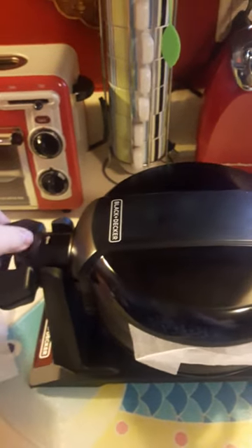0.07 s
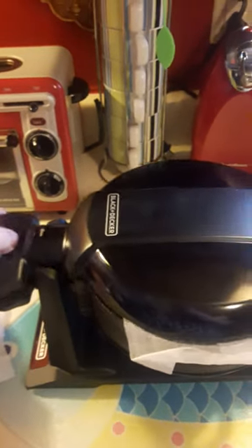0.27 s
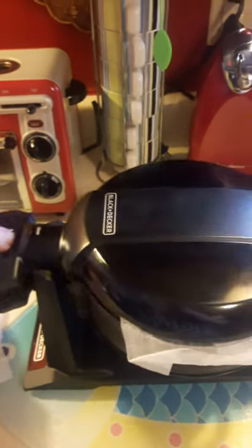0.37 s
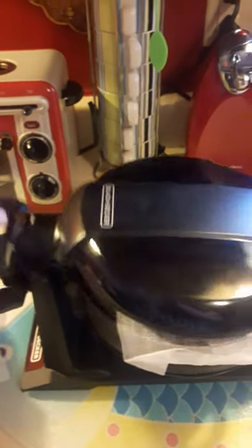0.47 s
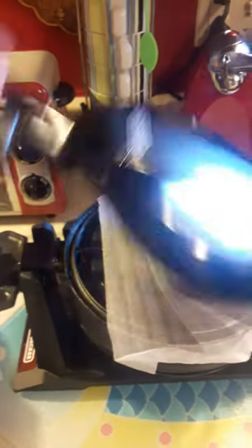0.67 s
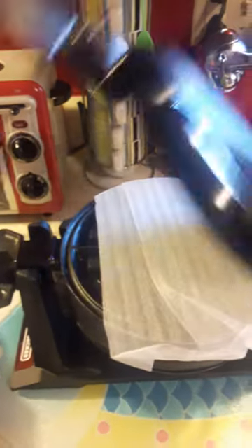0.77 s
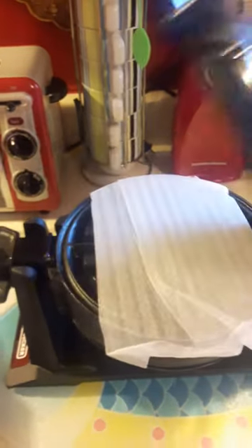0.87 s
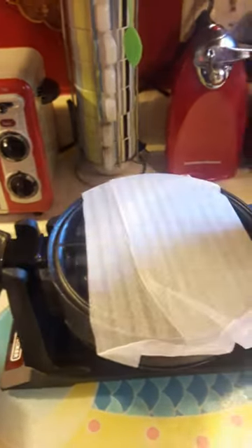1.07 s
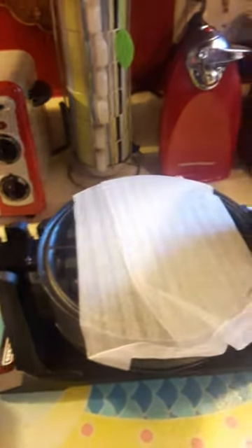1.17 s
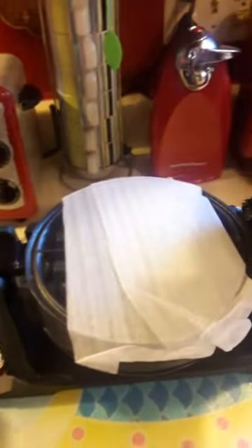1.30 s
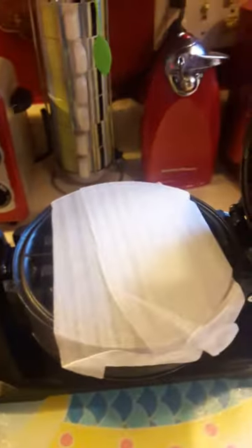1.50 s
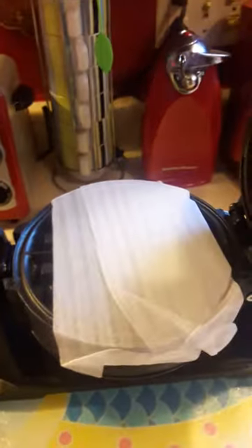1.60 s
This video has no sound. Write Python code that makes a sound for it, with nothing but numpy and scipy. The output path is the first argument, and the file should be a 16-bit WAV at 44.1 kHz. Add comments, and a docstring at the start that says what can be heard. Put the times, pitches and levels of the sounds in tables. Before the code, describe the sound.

A waffle maker's latch clacks sharply, then the lid swings open with hollow plastic knocks.

```python
"""A waffle maker's latch ticks, then snaps free with a sharp clack, close up in a quiet kitchen.
Each snap is a crack of plastic (a noise burst) plus the ring of the shell (damped modes).
The lid swings up, knocking and ticking in its hinge, and bumps against its stop.
The handle squeaks just before the latch, and faint friction follows the moving parts.
Every hit has a short room tail; a faint appliance hum and room air lie under it all."""
import sys
import numpy as np
from scipy import signal
from scipy.fft import rfft, irfft
from scipy.io import wavfile

SR = 44100
rng = np.random.default_rng(int(sys.argv[2]) if len(sys.argv) > 2 else 0)


def generate_wav(sig):
    """Save sig (samples, or channels by samples) to the path in sys.argv[1] as 16-bit PCM at SR."""
    pcm = np.round(np.clip(np.atleast_2d(sig).T, -1, 1) * 32767).astype(np.int16)
    wavfile.write(sys.argv[1], SR, pcm)


N = 72765
HIT_SAMPLES = SR // 2

# latch hits: (time [s], bass [dB], middle [dB], treble [dB], room send [dB], ring length [factor])
LATCH_SNAPS = [(.0912, -26.5, -38, -20, -8.5, 0.11), (.0945, -19, -17, -33.5, -10.5, .35),
               (.0995, -11.5, -23, -31.5, -9.5, .25), (.2238, -3, 2, 1.5, 0, 0.79)]
# ring of latch and closed shell: (frequency [Hz], level [dB], t60 [s], left-right [dB], attack [s])
SHELL_MODES = [(182.2, -34, 0.39, 2, 0.0094), (402, -23.5, 0.11, 0.5, 0.00045),
               (510.7, -21, 0.24, 4, 0.009), (560.4, -22, .24, -3, 0.0053), (692, -26, 0.18, -3, 0.0023),
               (780, -10.5, 0.046, -10, 0.00067), (811, -30, 0.46, -1.5, .01),
               (1042.3, -23, 0.32, -8.5, .01), (1065, -15.5, 0.059, 12, .002),
               (1367, -10.5, 0.039, 1.5, 0.00033), (1636, -24, 0.17, -1.5, .003),
               (2018, -32.5, 0.18, 0, .001), (2350, -28, 0.1, 3, 0.00087), (3796, -31.5, 0.1, 2.5, .001),
               (7530, -31.5, .15, -5.5, .001)]
# tone of the latch's crack and of its room tail: (frequency [Hz], level [dB])
LATCH_CRACK_COLOUR = [(40, -21.5), (200, -8), (500, -5.5), (850, 6), (1400, 1), (2500, -8), (4200, -2.5),
                      (7600, -4), (9700, -9.5), (11700, -11), (13300, -35), (14600, -28), (15800, -47.5)]
LATCH_TAIL_COLOUR = [(40, -17), (120, -14.5), (250, -6.5), (550, 0.5), (1050, 3.5), (1900, -10.5),
                     (3000, -14.5), (4000, -11.5), (7800, -14.5), (9600, -27), (11700, -19), (13300, -41.5),
                     (14600, -37), (15600, -61)]
def latch(crack_db=-9.0, shell_lag_s=0.002192, room_db=-21.5):
    """The catch cracks over its lip and the shell rings from the blow; the hand damps the first ticks."""
    out = np.zeros((2, N))
    for s, bass, middle, treble, send, length in LATCH_SNAPS:
        eq = [(300, bass), (900, middle), (4000, treble)]
        snap = crack(LATCH_CRACK_COLOUR, eq, lean=.1, attack_s=0.0029, t60=0.024, low_hz=260)
        add(out, s, amp(crack_db) * snap)
        add(out, s + shell_lag_s, ring(SHELL_MODES, eq, attack_s=0, length=length))
        add(out, s, amp(room_db + send) * room_tail(LATCH_TAIL_COLOUR, eq, build_s=.009))
    return out


# lid hits: (time [s], body [dB], thud [dB], upper middle [dB], treble [dB], room send [dB],
# pitch [factor], attack [s])
LID_KNOCKS = [(.749, -23, -19, -33, -40, 3.5, .95, 0.0052),
              (.9007, -10, -9.5, -19, -35.5, 1.5, 1.0, 0.0021),
              (1.2533, -17.5, -14, -14, -36, -13, 1.06, 0.0026),
              (1.2766, -3, -8.5, -8, -27.5, -15, .88, 0.0033), (1.3667, 3.5, 4, 1.5, 1.5, -2, 1.0, 0.00073),
              (1.3765, 0.5, -2.5, -0.5, -21, -3.5, 1.0, 0.00084),
              (1.407, -7.5, -22, -31, -28, -22, 0.85, 0.0024),
              (1.5981, -13, -6.5, -19.5, -37, -7, 1.02, .0005)]
# ring of the open lid: (frequency [Hz], level [dB], t60 [s], left-right [dB], attack [s])
LID_MODES = [(149, -43, 0.2, 3, 0.063), (188, -40.5, .17, 6, 0.0047), (381.3, -31, 0.086, 0.5, 0.00095),
             (514.2, -26.5, 0.084, 1.5, 0.0084), (668, -23.5, 0.082, -8, 0.0028),
             (735.8, -21, 0.073, -2.5, 0.003), (880, -36, 0.042, 40, 0.0012), (1134, -33, 0.12, -4, 0.0035),
             (1317, -34.5, 0.045, 7, 0.00087)]
# tone of the lid's clatter and of its room tail: (frequency [Hz], level [dB])
LID_CRACK_COLOUR = [(40, -32), (200, -28), (700, 5), (1300, -1.5), (2000, -2), (4000, -9.5), (7300, -10.5),
                    (9500, -20), (11000, -49), (15000, -50)]
LID_TAIL_COLOUR = [(40, -41), (170, 1), (330, -6), (700, 1), (1400, -13.5), (2400, -13.5), (4000, -27.5),
                   (7500, -28.5), (10000, -38.5), (15000, -56)]
def lid(crack_db=-26, room_db=-36):
    """The lid knocks in its hinge and bounces on its stop, ringing briefly each time."""
    out = np.zeros((2, N))
    for s, body, thud, upper, treble, send, pitch, attack_s in LID_KNOCKS:
        eq = [(180, body), (370, thud), (700, body), (2000, upper), (5500, treble)]
        clatter = crack(LID_CRACK_COLOUR, eq, lean=2.0, attack_s=0.0028, t60=0.05, low_hz=173)
        add(out, s, amp(crack_db) * clatter)
        add(out, s, ring(LID_MODES, eq, attack_s, pitch))
        add(out, s, amp(room_db + send) * room_tail(LID_TAIL_COLOUR, eq, build_s=0.012))
    return out


# stereo image of the close clatter: (frequency [Hz], left-right correlation [-1..1])
CLOSE_CORRELATION = [(300, 0.69), (550, 0.51), (900, .3), (2500, -0.42), (5000, -0.15), (14000, -0.63)]
def crack(colour, eq, lean, attack_s, t60, low_hz):
    """The transient of a hit: a short clatter of plastic parts too small to radiate deep bass."""
    t = np.arange(HIT_SAMPLES) / SR
    burst = noise(colour, HIT_SAMPLES, eq, lean, CLOSE_CORRELATION)
    return highpass(burst * rise(t, attack_s) * fall(t, t60), low_hz)


# stereo spread of the ring: (frequency [Hz], phase lead of the left channel [rad])
PHASE_LEAD = [(200, 1.1), (450, 0.18), (780, 1.27), (1100, 1.34), (1400, 1.5), (2000, 0.27), (8000, 0.95)]
def ring(modes, eq, attack_s, pitch=1, length=1):
    """The body of a hit: damped modes of the struck part; the heavy ones take longer to build up."""
    t = np.arange(HIT_SAMPLES) / SR
    out = np.zeros((2, HIT_SAMPLES))
    for hz, db, t60, side_db, rise_s in modes:
        lead = read(PHASE_LEAD, hz) * np.array([[.5], [-.5]])
        envelope = rise(t, max(attack_s, rise_s)) * fall(t, t60 * length)
        motion = np.sin(2 * np.pi * hz * pitch * t + lead) * envelope
        velocity = np.gradient(motion, axis=1) * SR / (2 * np.pi * hz)
        out += amp(db + read(eq, hz)) * pan(side_db) * velocity
    return out


# hinge ticks: (time [s], level [dB], treble tilt [dB])
HINGE_TICKS = [(0.7409, -16, -8), (1.0012, -17.5, -4), (1.0591, -13, -8), (1.1599, -22.5, -1.5),
               (1.2558, 3, -3.5), (1.4517, -18, -4.5), (1.5245, -11, 4)]
# tone of a tick: (frequency [Hz], level [dB])
HINGE_COLOUR = [(100, 4), (800, 0.5), (2000, -13), (4500, -31), (7500, -16), (11000, -33), (15000, -44)]
def hinge_ticks(tick_db=-35, room_db=-55):
    """Tiny, nearly dry ticks as the hinge turns and settles."""
    out = np.zeros((2, N))
    for s, db, tilt in HINGE_TICKS:
        eq = [(3000, db), (6500, db + tilt)]
        tick = crack(HINGE_COLOUR, eq, lean=0.89, attack_s=0.00023, t60=0.011, low_hz=300)
        add(out, s, amp(tick_db) * tick)
        add(out, s, amp(room_db) * room_tail(HINGE_COLOUR, eq, build_s=.004))
    return out


def handle_rub(start_s=.021, length_s=0.061, level_db=-37, roughness=0.54, width_hz=200,
               hz=795, glide_hz=200, glide_s=0.0061):
    """The handle chafes against the catch: a hollow squeak that scoops up in pitch and ebbs away."""
    t = np.arange(HIT_SAMPLES) / SR
    pole = np.exp(-np.pi * width_hz / SR)
    white = rng.standard_normal((2, 2, HIT_SAMPLES))
    # low-passed noise roughens the tone's level and phase
    grit = roughness * unit(signal.lfilter([1], [1, -2 * pole, pole * pole], white))
    phase = 2 * np.pi * np.cumsum(hz - glide_hz * np.exp(-t / glide_s)) / SR
    squeak = (1 + grit[0]) * np.sin(phase) + grit[1] * np.cos(phase)
    envelope = rise(t, attack_s=0.006) * np.maximum(1 - t / length_s, 0)
    out = np.zeros((2, N))
    add(out, start_s, amp(level_db) * pan(side_db=-8) * squeak * envelope)
    return out


# fader ride of the friction: (time [s], level [dB])
FRICTION_LEVEL = [(0, -56.5), (.05, -49), (.18, -56.5), (0.499, -53.5), (.62, -63), (.72, -57.5),
                  (.85, -63), (1.18, -63), (1.249, -53.5), (1.34, -48.5), (1.5, -59.5), (1.58, -52),
                  (1.65, -60.5)]
# tone of the friction: (frequency [Hz], level [dB])
FRICTION_COLOUR = [(100, -4.5), (700, 6), (1400, -7.5), (3000, -20), (4200, -17), (5400, -29),
                   (6500, -34.5), (7300, -17), (8100, -45), (9000, -28.5), (14000, -47)]
def friction():
    """Soft sliding noise while the handle and the lid move."""
    level_db = np.interp(np.arange(N) / SR, *np.transpose(FRICTION_LEVEL))
    return noise(FRICTION_COLOUR, N, lean=.8) * amp(level_db)


# reverb time of the kitchen: (frequency [Hz], t60 [s])
KITCHEN_DECAY = [(100, .42), (400, 0.39), (1000, 0.35), (2500, 0.45), (4200, 0.37), (8000, .36),
                 (11500, 0.33), (14000, 0.206)]
def room_tail(colour, eq, build_s):
    """Diffuse kitchen reverb for one hit: each band of noise dies at its own speed."""
    t = np.arange(SR) / SR
    log_hz = np.log(np.fft.rfftfreq(SR, 1 / SR) + 1)
    spectrum = rfft(noise(colour, SR, eq))
    centres, t60s = np.transpose(KITCHEN_DECAY)
    bands = [np.interp(log_hz, np.log(centres), row) for row in np.eye(len(centres))]
    tail = sum(irfft(spectrum * band, SR) * fall(t, t60) for band, t60 in zip(bands, t60s))
    return rise(t, build_s) * tail


# tones of the hum: (frequency [Hz], level [dB])
HUM_TONES = [(92, -71.5), (237, -71.5), (279, -66), (355.3, -60.5), (479, -66)]
def appliance_hum(waver=0.31):
    """A faint appliance hum whose tones drift slowly in level and phase."""
    t = np.arange(N) / SR
    knots = np.linspace(0, t[-1], 14)
    out = np.zeros(N)
    for hz, db in HUM_TONES:
        swell, drift = (waver * np.interp(t, knots, row) for row in rng.standard_normal((2, len(knots))))
        phase = 2 * np.pi * (hz * t + rng.random())
        out += amp(db) * np.sqrt(2) * ((1 + swell) * np.sin(phase) + drift * np.cos(phase))
    return out


# tone of the room air: (frequency [Hz], level [dB])
AIR_COLOUR = [(25, -32), (55, -9.5), (90, -4.5), (140, -3.5), (260, -3), (420, -3.5), (650, -16.5),
              (900, -13.5), (1500, -21), (2400, -23), (3200, -37), (4200, -27.5), (5200, -42),
              (7200, -36.5), (9000, -42), (15500, -45.5)]
def room_air(level_db=-58.5):
    """A steady, dark bed of kitchen air."""
    return amp(level_db) * noise(AIR_COLOUR, N, lean=0.94)


# stereo image of the room, nearly mono in the bass: (frequency [Hz], left-right correlation [-1..1])
ROOM_CORRELATION = [(50, 0.98), (300, 0.92), (520, 0.8), (900, .1), (3000, .05), (15000, .05)]
# pan curve of all noise layers, scaled by lean: (frequency [Hz], left-right [dB])
PAN_CURVE = [(150, 1.5), (550, -4), (950, -4), (1400, 1.5), (2200, 3.5), (5000, 5.5), (8000, 6.5),
             (14000, 1.5)]
def noise(colour, size, eq=None, lean=1, correlation=ROOM_CORRELATION):
    """Stereo noise: the colour sets only the tone, then EQ and pan shape each frequency's level."""
    hz = np.fft.rfftfreq(size, 1 / SR)
    left, independent = np.exp(2j * np.pi * rng.random((2, len(hz))))
    shared = np.clip(read(correlation, hz), -1, 1)
    right = shared * left + np.sqrt(1 - shared ** 2) * independent
    gain = unit(amp(read(colour, hz))) * (amp(read(eq, hz)) if eq else 1)
    spectrum = np.array([left, right]) * gain * pan(lean * read(PAN_CURVE, hz))
    return irfft(spectrum, size) * np.sqrt(size)


def amp(db):
    """Decibels to gain."""
    return 10 ** (np.asarray(db) / 20)


def unit(x):
    """Scales to rms 1."""
    return x / np.sqrt(np.mean(x ** 2) + 1e-20)


def read(curve, hz):
    """Reads a curve on a log-frequency axis."""
    frequencies, values = np.transpose(curve)
    return np.interp(np.log(hz + 1), np.log(frequencies), values)


def pan(side_db):
    """Constant-power left and right gains; positive leans left."""
    gains = amp(np.array([np.atleast_1d(side_db), -np.atleast_1d(side_db)]) / 2)
    return gains / np.sqrt((gains ** 2).mean(0))


def add(mix, start_s, sound):
    """Mixes a sound in at its cue."""
    part = mix[:, max(round(start_s * SR), 0):][:, :sound.shape[1]]
    part += sound[:, :part.shape[1]]


def rise(t, attack_s):
    """Smooth fade-in."""
    return np.sin(np.pi / 2 * np.clip(t / max(attack_s, 1e-5), 0, 1)) ** 2


def fall(t, t60):
    """Exponential decay, 60 dB down after t60 seconds."""
    return np.exp(-np.log(1000) * t / max(t60, 1e-4))


def highpass(x, hz):
    """Low cut, 12 dB per octave."""
    return signal.sosfilt(signal.butter(2, hz, "high", fs=SR, output="sos"), x)


def scene():
    """The waffle maker's moving parts over the kitchen bed."""
    return latch() + lid() + hinge_ticks() + handle_rub() + friction() + room_air() + appliance_hum()


def record(dry, low_hz=45, high_hz=15800):
    """Master EQ: a gentle bass roll-off and a steep high cut."""
    high_cut = signal.firwin(401, high_hz, window=("kaiser", 9), fs=SR)
    return signal.oaconvolve(highpass(dry, low_hz), high_cut[None], "same", axes=1)


dry = scene()
out = record(dry)
generate_wav(out)
```